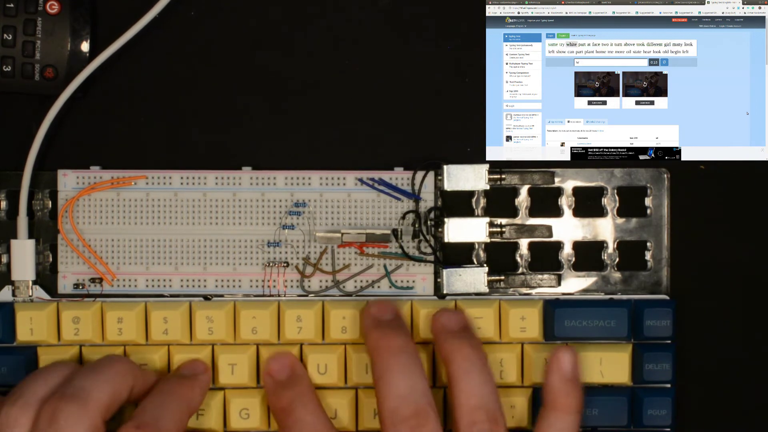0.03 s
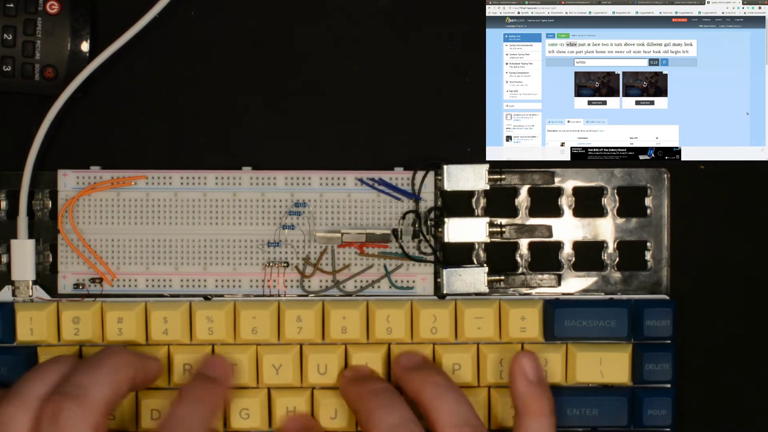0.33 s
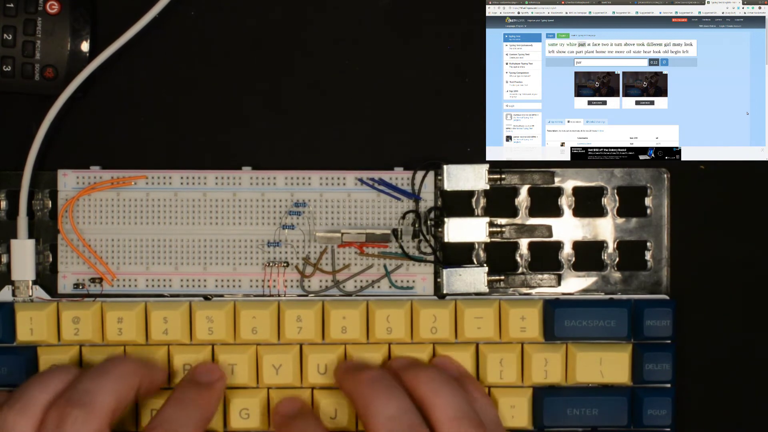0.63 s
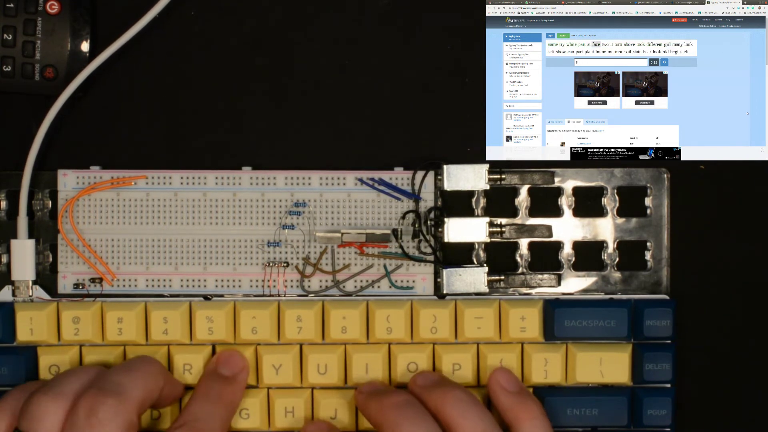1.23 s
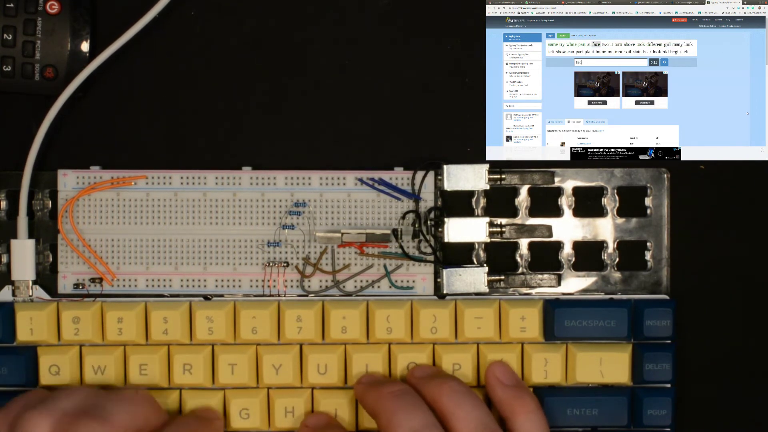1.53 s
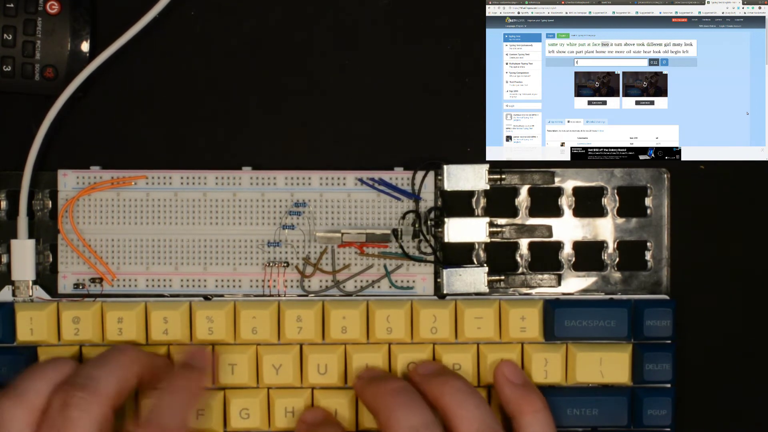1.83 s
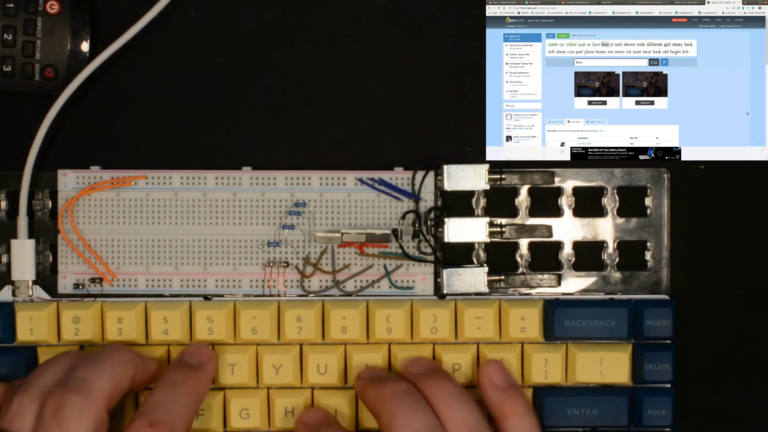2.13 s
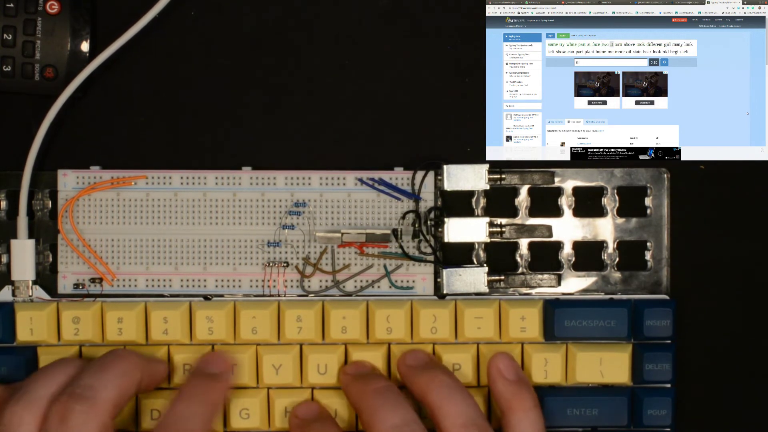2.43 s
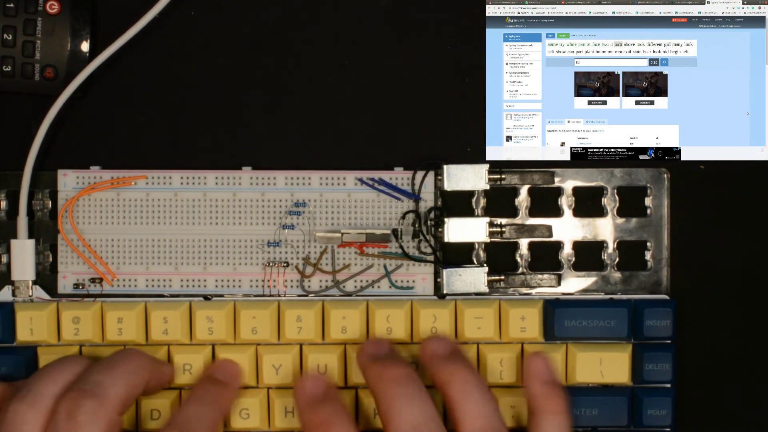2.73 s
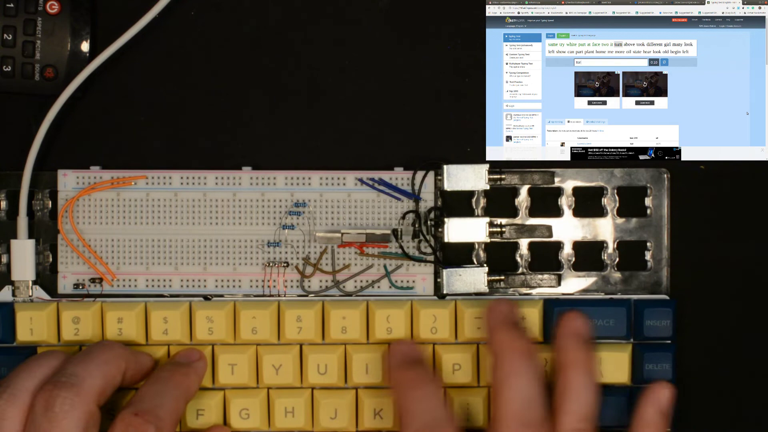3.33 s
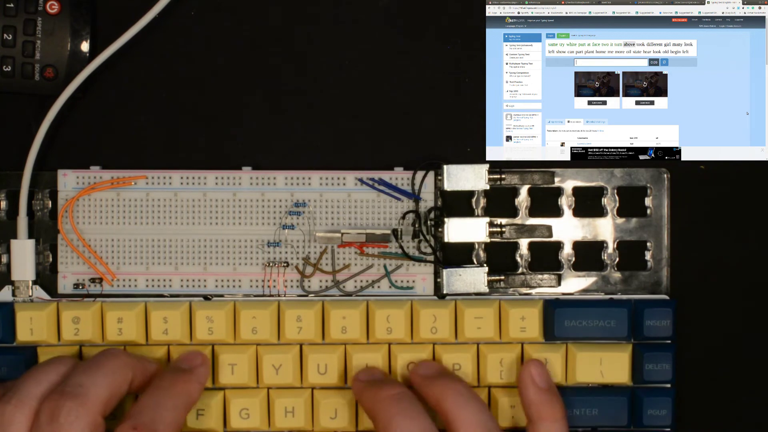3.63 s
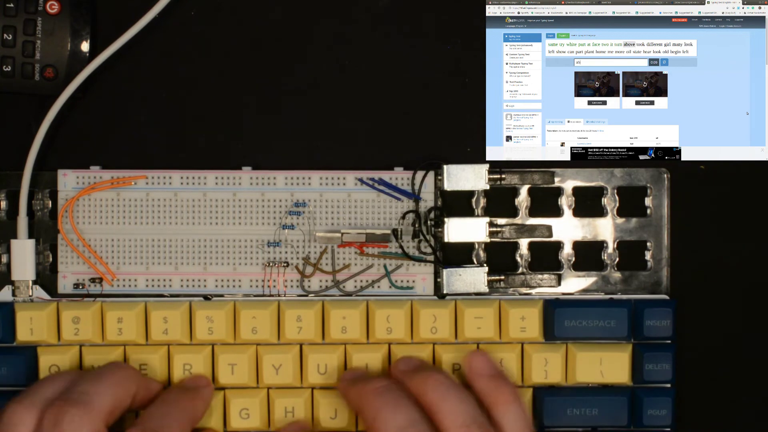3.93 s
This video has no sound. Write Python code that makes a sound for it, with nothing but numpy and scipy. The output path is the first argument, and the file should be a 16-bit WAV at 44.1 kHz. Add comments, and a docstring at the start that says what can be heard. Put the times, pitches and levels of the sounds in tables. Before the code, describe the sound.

Fast mechanical keyboard typing, each keystroke firing a small solenoid with a sharp clack.

```python
"""Typing with three solenoids

Fast, close typing on a mechanical keyboard fires three small solenoids in turn. Keycaps clack and the desk
thuds under the fingers; each plunger slams home, rattles, then pings as it springs back. A small room answers,
over a low rumble and hum. The sharpest peaks are softly rounded off."""
import sys
import numpy as np
from scipy import signal
from scipy.fft import rfft, irfft
from scipy.io import wavfile

SR = 44100
rng = np.random.default_rng(int(sys.argv[2]) if len(sys.argv) > 2 else 0)


def generate_wav(signal):
    """Clip the signal to [-1, 1] and save it as 16-bit WAV at the path in sys.argv[1]."""
    frames = np.transpose(np.atleast_2d(signal))
    scaled = np.clip(frames, -1, 1) * 32767
    pcm = np.round(scaled).astype(np.int16)
    wavfile.write(sys.argv[1], SR, pcm)


N = 176400

# colour of the room tone (frequency [Hz], relative level [dB])
ROOM_TONE = [(15, 2.5), (35, -1.5), (60, -0.5), (80, -11), (125, -11.5), (180, -20), (330, -18.5),
             (480, -26.5), (1000, -29.5), (3000, -30.5), (8000, -39.5), (16000, -49)]
# hum partials (frequency [Hz], RMS level [dB])
HUM = [(56, -56.5), (120, -60.5), (240, -67.5)]
# keystrokes, dealt to the solenoids in turn (strike time [s], desk thud level [dB])
STROKES = [(0.004, -36.5), (0.1264, -33.5), (0.1676, -47), (0.2783, -45.5), (0.3455, -52), (0.3864, -38),
           (0.472, -48), (0.5715, -44), (0.6524, -40), (0.7841, -36), (0.8605, -33), (0.9687, -43),
           (1.05, -46), (1.1478, -37.5), (1.2676, -40), (1.3423, -51), (1.4737, -51), (1.6204, -32.5),
           (1.6976, -37), (1.7809, -45), (1.9266, -43), (2.062, -38), (2.1277, -35), (2.2415, -35),
           (2.361, -45), (2.4257, -39), (2.5364, -48), (2.6663, -46), (2.8827, -52), (3.1672, -51),
           (3.3253, -36), (3.4355, -35.5), (3.5159, -39), (3.7811, -53), (3.8997, -41)]
# desk resonances (frequency [Hz], level [dB], t60 [s])
DESK_MODES = [(55.7, 4, 0.22), (90.5, 2.5, 0.073), (119, -6.5, 0.17), (235.7, -12, 0.25),
              (343, -5.5, 0.069), (408, -12, 0.065)]
# each solenoid's mix (ring [dB], crack [dB], snap [dB], crack t60 [s], return tick [dB], room send [dB])
SOLENOIDS = [(-3, 0, 19, 0.013, -21, -13), (-1.5, -0.16, 12, 0.015, -25.5, -12.5),
             (-0.6, 0.2, 16.5, 0.017, -31, -11.5)]
# ring of each solenoid on its plastic mount (frequency [Hz], level [dB], t60 before damping [s])
MOUNT_MODES = [
    [(976, -23.5, 0.0098), (1318, -27, 0.084), (2180, -57, 0.039), (2358, -17, 0.016), (3540, -85, 0.037),
     (3552, -11.0, 0.025), (3804, -15, 0.018), (4124, -21.5, 0.017), (4340, -67, 0.019), (5400, -40, 0.081),
     (6050, -17.5, 0.084), (5850, -25, 0.029), (7070, -39, 0.01), (7260, -23.5, 0.02)],
    [(886, -34, 0.013), (1298, -56.5, 0.023), (2045, -20.9, 0.046), (2405, -20, 0.057), (3225, -20, 0.021),
     (3530, -15, 0.012), (4500, -34.5, 0.053), (5210, -24, 0.066), (6180, -27.5, 0.028),
     (6550, -20.5, 0.018), (7144, -16.5, 0.0073), (7500, -36, 0.014), (10900, -27, 0.018),
     (12200, -22, 0.0066)],
    [(1150, -27, 0.037), (1630, -80, 0.021), (2126, -21.5, 0.04), (2453, -16.5, 0.016), (3330, -29, 0.05),
     (3605, -19.5, 0.038), (3855, -22.5, 0.044), (4860, -23.5, 0.077), (4970, -20.5, 0.019),
     (6050, -38, 0.021), (6240, -14, 0.0056), (6770, -29, 0.0093), (11300, -16.5, 0.0053),
     (12540, -24.5, 0.0049)],
]
# colour of each solenoid's crack (frequency [Hz], gain [dB])
CRACK_COLOURS = [
    [(150, -14.5), (330, -25.5), (600, -26), (1100, -29), (1600, -32), (2100, -4.5), (2700, -17),
     (3400, 3.5), (4500, -6), (6500, -7.5), (8300, -10), (9200, -19), (12500, -22.5), (16000, -19.5)],
    [(150, -19.5), (330, -25), (600, -31), (1100, -20.5), (1600, -28.5), (2100, -10), (2700, -14.5),
     (3250, -7.5), (3900, -12.5), (6500, -9), (8300, -23), (9500, -22), (12500, -14.5), (16000, -26)],
    [(150, -19.5), (330, -15.5), (600, -27.5), (1100, -11.5), (1550, -27.5), (2200, -10), (2800, -14),
     (3500, -13), (6500, -9), (8300, -20), (9500, -18.5), (12500, -17), (16000, -23)],
]
# each plunger's rattle (delay after landing [s], level against the landing [dB])
BOUNCES = [
    [(.00362, -3.5), (.00578, -8), (.00725, -20.5)],
    [(.00091, -4), (.00318, -10), (.00477, -14)],
    [(.00122, -38), (.00287, -9), (.00434, -11)],
]
# each plunger's return to its back stop (delay after landing [s])
RETURN_DELAYS = [.0151, .0170, .0170]
# ping of each returning plunger (frequency [Hz], level [dB], t60 [s])
PING_MODES = [
    [(3400, -69.5, .03), (7400, -78, 0.025), (8200, -22, 0.024), (11170, -30, 0.027), (13000, -32, 0.012),
     (15300, -41, .015)],
    [(8055, -25.5, 0.029), (8192, -17.5, 0.025), (12000, -31.5, .018), (15400, -41, .015)],
    [(3180, -28.5, 0.048), (7940, -25.5, 0.019), (9780, -31.5, 0.031), (11300, -39.5, 0.028),
     (13560, -30, .018), (14700, -30, .018)],
]
# colour of the tick on the back stop (frequency [Hz], gain [dB])
RETURN_TICK_COLOUR = [(300, -5), (1200, 1), (2500, 4), (6000, -5), (8000, 8), (10000, 8), (12000, 8),
                      (16000, 1)]
# keycaps landing or springing up (time [s], hollow case level [dB], bright cap level [dB])
KEY_CLACKS = [(0.1181, -20, -16.5), (0.1635, -43, -20), (0.2382, -28, -23), (0.2754, -32, -34),
              (0.3409, -43, -28), (0.3813, -33, -17), (0.4619, -54, -47), (0.567, -45, -21.5),
              (0.6472, -34, -19), (0.7039, -28.5, -19), (0.7755, -34, -16.5), (0.8535, -20, -10.5),
              (0.9645, -35, -19), (1.0427, -29, -16), (1.1223, -32, -31), (1.1437, -30, -20),
              (1.2635, -29, -23), (1.338, -43, -20), (1.4174, -41, -22), (1.47, -35, -24),
              (1.5444, -21, -19.5), (1.6115, -35, -18), (1.6922, -26, -18), (1.7773, -35, -24),
              (1.867, -26, -21), (1.9205, -30, -23), (2.0185, -52, -17), (2.0568, -35, -22),
              (2.1225, -28, -12.5), (2.2357, -28, -17), (2.3523, -31, -22), (2.4218, -29, -26),
              (2.5316, -34, -27), (2.6213, -33.5, -35), (2.7214, -25.5, -24.5), (2.8634, -37, -27),
              (2.9178, -18.5, -14.5), (3.3191, -37, -17.5), (3.401, -30, -17.5), (3.416, -44, -45),
              (3.4293, -20, -17), (3.5118, -20.5, -17.5), (3.5439, -23, -26), (3.6307, -37, -35),
              (3.7762, -25, -24), (3.878, -33, -30), (3.8961, -23, -20), (3.9956, -24.5, -20)]
# keyboard case resonances (frequency [Hz], level [dB], t60 [s])
CASE_MODES = [(740, -15.5, 0.0076), (962, -7.5, 0.017), (1170, -16, 0.02)]
# keycap resonances (frequency [Hz], level [dB], t60 [s])
CAP_MODES = [(2053, -17, 0.026), (2720, -6, 0.019), (3025, -7.5, .013), (4560, -24, 0.012)]
# colour of the keycap tick (frequency [Hz], gain [dB])
CAP_TICK_COLOUR = [(300, -12.5), (1500, 6), (3500, 8), (6000, -2), (10000, -2.5), (16000, -22)]
# decay of the room's tail (frequency [Hz], t60 [s])
ROOM_DECAY = [(200, 0.07), (1000, 0.18), (3500, 0.3551), (8000, 0.25), (15000, 0.22)]
# colour of the reverb (frequency [Hz], gain [dB])
ROOM_COLOUR = [(200, 8), (400, 8.5), (700, 13.5), (1100, 1.5), (1500, 6), (2200, -4), (2750, 3),
               (3350, -3.5), (4500, 0.5), (6000, -4), (8200, 0.5), (11000, -1.5), (15000, -4.5)]

ROOM_TONE_RMS_DB = -44
THUD_LEAD_S, THUD_RISE_S = 0.00347, 0.0027
MOUNT_LOW_CUT_HZ, MOUNT_MAX_T60_S, CRACK_VARIATION_DB, RETURN_TICK_T60_S = 987, 0.024, -7, 0.0067
KEY_LOW_CUT_HZ, KEY_TICK_T60_S, KEY_TICK_DB, KEY_ROOM_DB = 730, 0.023, -10, -12.5
# random spread from hit to hit, as a fraction of pitch or bounce delay
DESK_DETUNE, MOUNT_DETUNE, KEY_DETUNE, BOUNCE_SPREAD = 0.038, 0.009, 0.042, 0.015
PREDELAY_S, EARLY_T60_S, EARLY_DB, CROSSFADE_HZ = 0.006, 0.26, -6, 0.43
CEILING, HIGH_CUT_HZ = 0.88, 16000


def amp(db):
    """Decibels to gain."""
    return 10 ** (np.asarray(db) / 20)


def decay(t, t60):
    """An envelope that falls 60 dB in t60 seconds."""
    return np.exp(-np.log(1000) * t / t60)


def curve_at(points, hz):
    """A table's value on a log-frequency axis."""
    frequencies, values = np.transpose(points)
    return np.interp(np.log(hz + 1), np.log(frequencies), values)


def add(mix, start_s, sound):
    """Lays a sound into the mix."""
    part = mix[max(round(start_s * SR), 0):][:len(sound)]
    part += sound[:len(part)]


def colour(x, points):
    """Zero-phase EQ from a colour table."""
    return irfft(rfft(x) * amp(curve_at(points, np.fft.rfftfreq(len(x), 1 / SR))), len(x))


def causal_colour(x, points, size=4096):
    """Minimum-phase EQ: it rings only after the hit."""
    log_gain = np.log(amp(curve_at(points, abs(np.fft.fftfreq(size, 1 / SR)))))
    response = np.exp(signal.hilbert(log_gain).conj())
    return np.fft.ifft(np.fft.fft(x, size) * response).real


def low_cut(x, hz, order=4):
    """Small parts radiate little bass."""
    return signal.lfilter(*signal.butter(order, hz, "high", fs=SR), x)


def ring(modes, detune=0, size=4096):
    """Struck modes: decaying sines, each randomly off pitch if detune is set."""
    hz, db, t60 = np.transpose(modes)
    pitch = 1 + detune * rng.standard_normal(len(hz)) if detune else 1
    t = np.arange(size)[:, None] / SR
    return (amp(db) * decay(t, t60) * np.sin(2 * np.pi * hz * pitch * t)).sum(1)


def burst(points, t60, snap=0, size=4096):
    """Countless short modes blur into dying noise; snap puts one sharp contact on the front."""
    drive = rng.standard_normal(size) * decay(np.arange(size) / SR, t60)
    drive[0] += snap
    return causal_colour(drive, points)


def room_tone():
    """A bed of low rumble, faint hiss and steady hum."""
    t = np.arange(N) / SR
    noise = colour(rng.standard_normal(N), ROOM_TONE)
    hum = sum(amp(db) * np.sqrt(2) * np.sin(2 * np.pi * (hz * t + rng.random())) for hz, db in HUM)
    return amp(ROOM_TONE_RMS_DB) * noise / noise.std() + hum


def desk_thuds(size=16384):
    """Each finger's push sets the desk thudding, just ahead of the solenoid."""
    out = np.zeros(N)
    attack = 1 - np.exp(-np.arange(size) / SR / THUD_RISE_S)
    for strike_s, thud_db in STROKES:
        add(out, strike_s - THUD_LEAD_S, -amp(thud_db) * attack * ring(DESK_MODES, DESK_DETUNE, size))
    return out


def solenoid(index):
    """The plunger lands and bounces almost the same way each time, then pings against its back stop."""
    ring_db, crack_db, snap_db, crack_t60, tick_db, room_db = SOLENOIDS[index]
    contacts = [(0, 0)] + BOUNCES[index]
    damped_modes = [(hz, db, min(t60, MOUNT_MAX_T60_S)) for hz, db, t60 in MOUNT_MODES[index]]
    cracks = [burst(CRACK_COLOURS[index], crack_t60, amp(snap_db)) for _ in contacts]
    ping = low_cut(ring(PING_MODES[index]), MOUNT_LOW_CUT_HZ)
    out = np.zeros(N)
    for strike_s, _ in STROKES[index::len(SOLENOIDS)]:
        body = amp(ring_db) * low_cut(ring(damped_modes, MOUNT_DETUNE), MOUNT_LOW_CUT_HZ)
        stretch = 1 + BOUNCE_SPREAD * rng.standard_normal()
        for (delay_s, contact_db), crack in zip(contacts, cracks):
            variation = amp(CRACK_VARIATION_DB) * burst(CRACK_COLOURS[index], crack_t60)
            hit = body + amp(crack_db) * (crack + variation)
            add(out, strike_s + delay_s * stretch, amp(contact_db) * hit)
        tick = amp(tick_db) * burst(RETURN_TICK_COLOUR, RETURN_TICK_T60_S)
        add(out, strike_s + RETURN_DELAYS[index], ping + tick)
    return out + amp(room_db) * crossfaded_room(out)


def room(x, size=32768, samples_per_echo=6):
    """Quick, dense reflections from the desk area blend with the small room's tail."""
    echoes = rng.choice([-1., 1.], size) * (rng.integers(0, samples_per_echo, size) == 0)
    hz, t, spectrum = signal.stft(echoes, SR, nperseg=256)
    tail = signal.istft(spectrum * decay(t, curve_at(ROOM_DECAY, hz)[:, None]), SR)[1][:size]
    early = rng.standard_normal(size) * decay(np.arange(size) / SR, EARLY_T60_S)
    blend = tail / np.linalg.norm(tail) + amp(EARLY_DB) * early / np.linalg.norm(early)
    fade_out = np.minimum(np.linspace(10, 0, size), 1)
    out = np.zeros(N)
    add(out, PREDELAY_S, signal.fftconvolve(x, colour(blend, ROOM_COLOUR) * fade_out))
    return out


def crossfaded_room(x):
    """A slow crossfade between two reverbs keeps the room's tail from ringing on the same pitches."""
    angle = 2 * np.pi * CROSSFADE_HZ * np.arange(N) / SR
    return room(x * np.cos(angle)) + room(x * np.sin(angle))


def key_clacks():
    """Every key ticks and rings the hollow case and its own bright cap, at a slightly different pitch."""
    out = np.zeros(N)
    for time_s, case_db, cap_db in KEY_CLACKS:
        case = ring(CASE_MODES, KEY_DETUNE)
        cap = ring(CAP_MODES, KEY_DETUNE)
        tick = amp(KEY_TICK_DB) * burst(CAP_TICK_COLOUR, KEY_TICK_T60_S)
        add(out, time_s, amp(case_db) * case + amp(cap_db) * (tick - cap))
    return low_cut(out + amp(KEY_ROOM_DB) * room(out), KEY_LOW_CUT_HZ)


def scene():
    """Solenoids, keys, desk and room tone, mixed in mono."""
    solenoids = sum(solenoid(index) for index in range(len(SOLENOIDS)))
    return (solenoids + key_clacks() + desk_thuds() + room_tone())[None]


def record(dry):
    """The sharpest peaks are softly rounded off, then a steep high cut trims the very top."""
    rounded = dry / (1 + (dry / CEILING) ** 6) ** (1 / 6)
    high_cut = signal.firwin(255, HIGH_CUT_HZ, window=("kaiser", 9), fs=SR)
    return signal.oaconvolve(rounded, high_cut[None], "same")


dry = scene()
out = record(dry)
generate_wav(out)
```